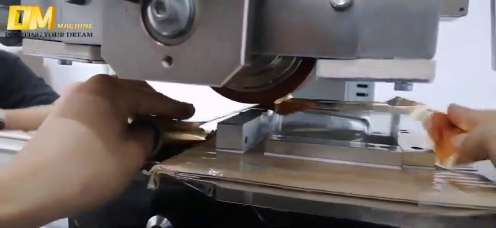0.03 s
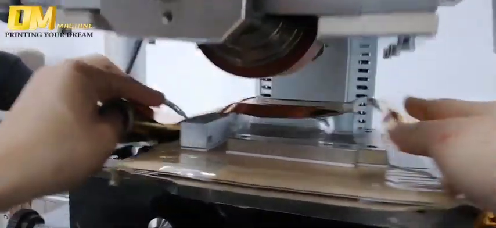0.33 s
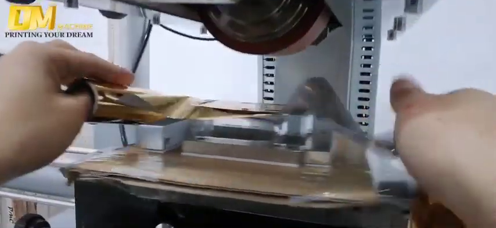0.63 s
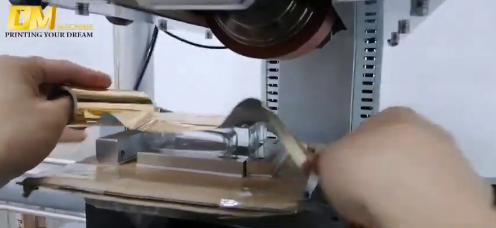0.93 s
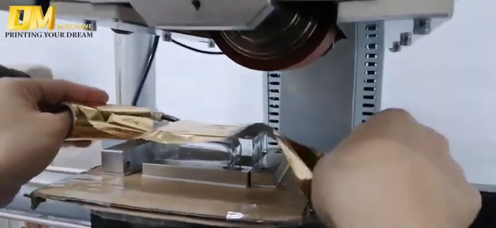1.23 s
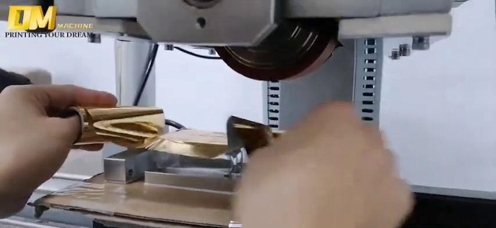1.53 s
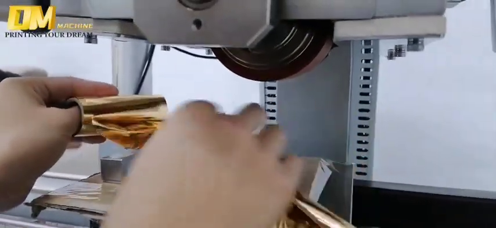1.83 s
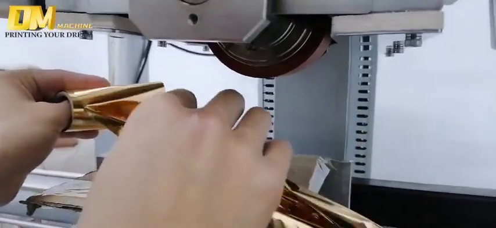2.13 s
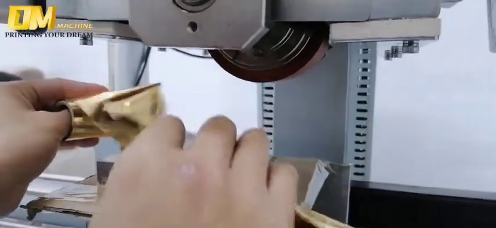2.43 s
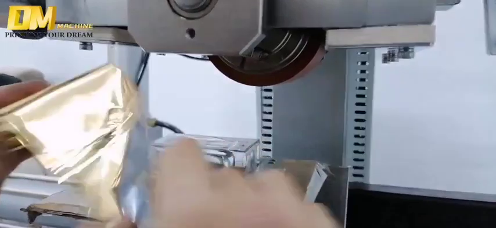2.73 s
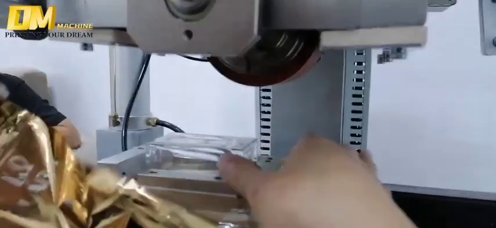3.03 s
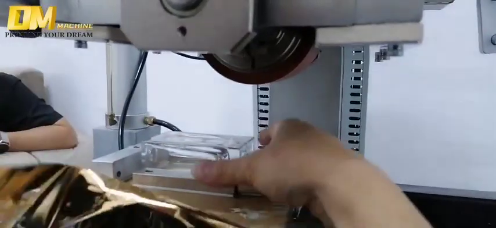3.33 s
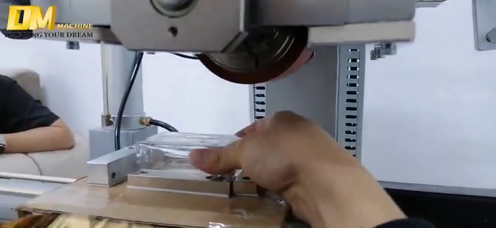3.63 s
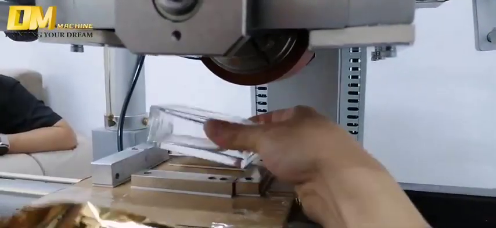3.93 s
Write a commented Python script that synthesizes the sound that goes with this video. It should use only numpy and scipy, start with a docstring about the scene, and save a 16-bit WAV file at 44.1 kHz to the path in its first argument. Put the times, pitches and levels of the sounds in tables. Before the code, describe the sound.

Thin metal foil crinkling close by is the main sound. First a press releases a hiss of air with a faint whistle, fading by about 1.5 seconds, with several dull, rattling knocks from 1 to 1.3. From 1.4 the foil is peeled away, rustling and snapping sharply, loudest between 2 and 3 seconds, thinning to a few ticks after 3.5. A low workshop rumble lies underneath.

```python
"""Peeling foil after hot stamping

A press lifts its roller: air hisses and whistles out, then the carriage knocks against its stop.
Close by, hands peel thin metal foil off a glass bottle and pull it aside. The foil hisses as it
slides, crinkles as tiny patches flip, and snaps as creases give way. The small workshop rumbles and hums."""
import sys
import numpy as np
from scipy import signal
from scipy.io import wavfile
from scipy.ndimage import uniform_filter1d

SR = 44100
rng = np.random.default_rng(int(sys.argv[2]) if len(sys.argv) > 2 else 0)


def master_out(mix):
    """Clip the mix to full scale and print it as 16-bit PCM to the path in sys.argv[1]."""
    frames = np.transpose(np.atleast_2d(mix))
    ceiling = np.clip(frames, -1, 1)
    pcm = np.round(ceiling * 32767).astype(np.int16)
    wavfile.write(sys.argv[1], SR, pcm)


N = 176400
TIME = np.arange(N) / SR

# Fading of the escaping air: time_s, treble_db, middle_db
EXHAUST_FADE = [(0, -30, -40), (.05, -34, -46), (.47, -35.5, -43.5), (.72, -37, -42.5), (.92, -41.5, -49),
                (1.1, -45, -52.5), (1.37, -49.5, -57.5), (1.8, -54, -72.5), (2.4, -57, -71.5),
                (4, -100, -100)]
# Tone of the air jet: pitch_hz, left_db, right_db
JET_TONE = [(298, -34.5, -19), (664, -12.5, -11.5), (885, -16.5, -10.5), (1610, -11, -5), (2680, -7.5, 0.5),
            (3230, -2, -5), (4300, -9.5, -9), (5200, -10, -3), (5950, -7, -4.5), (7150, -14, 6),
            (8080, -2.5, -8), (9000, -1, -2.5), (10000, -1, -6), (10830, -8.5, -11), (14300, -16, -8),
            (15400, -8, -6.5)]
# Notes that ring in the exhaust path: pitch_hz, width_hz, level_db
EXHAUST_NOTES = [(1402, 14, -2), (1473, 6.2, -4), (1950, 20, -0.5), (2133, 29, 2.5), (2860, 100, -12),
                 (3125, 35, -0.5), (3390, 77, 4)]
# Whistle at the air outlet: time_s, level_db
WHISTLE_FADE = [(0, -48), (.27, -43.5), (.38, -50.5), (.8, -53.5), (1.2, -63.5), (1.5, -86)]
# Drone of the press: time_s, level_db
DRONE_LEVEL = [(0, -45.5), (.2, -51), (.45, -60), (.9, -57.5), (1.3, -58.5), (1.8, -67), (3.4, -84.5),
               (3.85, -72), (4, -72.5)]
# Its tone: pitch_hz, level_db
DRONE_TONE = [(40, -5), (110, -10), (205, -1.5), (310, -15), (400, -5), (570, -17), (2000, -62)]
# Low rumble: time_s, level_db
RUMBLE_LEVEL = [(0, -46), (.38, -44), (.45, -56.5), (.95, -44), (1.45, -49.5), (1.8, -58), (2.25, -62),
                (2.55, -51), (3.1, -59.5), (3.5, -63.5), (3.85, -53), (4, -61.5)]
# Its tone: pitch_hz, left_db, right_db
RUMBLE_TONE = [(20.2, -14, -6), (40.1, -5, 3), (57, -19, -4.5), (104.5, -46, -30.5), (192, -24.5, -40),
               (720, -63, -54), (2000, -106, -106)]
# Tone of the room air: pitch_hz, level_db
AIR_TONE = [(200, -1.5), (1000, -10), (3000, -14.5), (9000, -18), (15000, -28)]
# Electric hum: pitch_hz, level_db
HUM_NOTES = [(49, -66), (150, -88), (200, -82)]
# Time the room's echo takes to drop 60 dB: pitch_hz, fade_s
ECHO_FADE = [(150, 0.27), (1000, 0.57), (4000, 0.19), (9000, 0.12), (15000, 0.11)]
# Carriage knocks, at relative levels: start_s, frame_db, rattle_db
KNOCKS = [(.992, -39.5, -45.5), (1.02, -35.5, -35.5), (1.154, -42, -42), (1.174, -41.5, -37.5),
          (1.264, -44.5, -45.5)]
# Notes of the press frame: pitch_hz, level_db, fade_s (to drop 60 dB)
FRAME_NOTES = [(129.6, -4, 0.88), (152.2, -1.5, 0.68), (183, 4, 0.46), (206.6, 3.5, 0.34),
               (249.8, -6, 0.53), (284, -3, 0.33), (552, -4, 0.17), (837, -7, 0.18)]
# Tone of the rattling fittings: pitch_hz, level_db
RATTLE_TONE = [(60, -8), (200, 3), (500, -2.5), (1000, -5), (2000, -10.5), (4000, -20), (9000, -42)]
# Hand strokes, at relative levels: start_s, length_s, level_db, crinkle_over_slide_db
STROKES = [(1.377, 0.037, -45.5, 5), (1.427, 0.258, -46.5, 0), (1.468, 0.046, -41.5, -6),
           (1.724, 0.087, -45, -7), (1.83, 0.27, -42.5, -3), (1.901, 0.16, -41, 1.5), (2.1, 0.218, -52, 16),
           (2.388, .086, -48, 9), (2.48, 0.062, -41, -3), (2.549, .058, -36, 1), (2.608, 0.16, -42, 3),
           (2.654, 0.045, -37, 1), (2.772, 0.28, -46, -26), (2.857, 0.14, -43.5, -2),
           (2.971, 0.051, -40, -4), (3.05, 0.038, -39.5, -8), (3.072, 0.44, -53.5, -1),
           (3.241, 0.043, -43, 2), (3.314, 0.12, -50.5, -5), (3.5, .45, -66, 6), (3.603, 0.041, -47, -5),
           (3.742, 0.027, -61.5, -6), (3.806, 0.023, -55.5, 0)]
# Where the foil is pulled: time_s, left_over_right_db
FOIL_PLACE = [(1.4, -3.5), (2, -8), (2.2, 1), (2.57, -3.5), (3, -1)]
# Snapping creases, at relative levels and places: start_s, level_db, leftward_db, length_s
SNAPS = [(1.402, -39, -1, 0.013), (1.483, -36, 1, 0.006), (1.514, -32, -3, .006), (1.555, -33.5, -5, .005),
         (1.594, -37.5, -5, 0.0035), (1.67, -33, -6, .008), (1.757, -32.5, -4, 0.0042),
         (1.7635, -27, -17, .001), (1.771, -32, -5, .003), (1.798, -36, -8, .009), (1.861, -33, -6, 0.0096),
         (1.928, -36, -6, .006), (2.003, -29, -12, 0.0075), (2.048, -36, -14, 0.0094),
         (2.0635, -30, -5, 0.0022), (2.0904, -26.5, -5, 0.0041), (2.142, -35, -5, .002),
         (2.174, -36.5, -6, .01), (2.199, -35, -8, 0.0099), (2.25, -47, 9, .002),
         (2.2567, -29.5, -9.5, 0.0051), (2.364, -36, -3, 0.0033), (2.387, -38, -7, 0.0027),
         (2.395, -35, -7.5, 0.0086), (2.463, -35, 0, 0.0043), (2.559, -33, 8, 0.0033),
         (2.565, -27.5, -16, 0.011), (2.618, -32, -5, 0.011), (2.643, -31, 3, .003),
         (2.665, -28.5, -1, .004), (2.678, -30, 2, 0.0075), (2.704, -27.5, -0.5, .008),
         (2.742, -37, -5, 0.014), (2.906, -29.5, -5.5, 0.0074), (2.942, -35, -5, 0.0056),
         (3.228, -39.5, -5, 0.0068), (3.271, -40, 12, 0.008), (3.298, -37, -3, 0.0037),
         (3.332, -33.5, 10, 0.0042), (3.366, -39.5, -1, 0.012), (3.456, -31.5, 1, 0.0033),
         (3.482, -41, -4, .009), (3.59, -36.5, -2, 0.0026), (3.9017, -42, 2, 0.0019),
         (3.9668, -41, 0, .0016)]
# Extra brightness of a snap: pitch_hz, level_db
SNAP_TONE = [(3000, -2.5), (7000, 2), (12000, 1.5)]
# Folds of the whole sheet: start_s, level_db
FOLDS = [(1.861, -55), (2.02, -52), (2.179, -53), (2.575, -51), (2.619, -48.5), (2.671, -49),
         (2.735, -57.5), (2.88, -51), (2.905, -50), (3.257, -59)]
# Tone of their crunch: pitch_hz, level_db
FOLD_TONE = [(100, -28), (900, 1.5), (1700, -3.5), (2800, 4), (4300, -5.5), (9000, -37)]
# Tone of the foil: pitch_hz, left_db, right_db
FOIL_TONE = [(60, -34, -39), (510, -19.5, -24), (1010, -14.5, -16.5), (1550, -22, -19), (2520, -9, -13),
             (3990, -15, -19), (5050, -8, -7), (7200, -12, -3), (9200, 1, -10.5), (10160, 1, -5.5),
             (10230, -8, -7), (13200, -9, -12.5), (14500, -12.5, -7)]
# Top treble of the foil, tight and then slack: time_s, boost_db
TIGHTNESS = [(2.2, 3.5), (2.6, -3.5)]
# Low swell as the hand takes the glass: time_s, level_db
SWELL_LEVEL = [(3.3, -88.5), (3.82, -67.5), (4, -70)]


def amp(db):
    """Turns decibels into a gain."""
    return 10 ** (np.asarray(db) / 20)


def unit(x):
    """Scales to an average power of 1."""
    return x / np.sqrt(np.mean(x ** 2) + 1e-20)


def read(table, hz, column=1):
    """Looks up a table by pitch, on a log scale."""
    table = np.array(table)
    return np.interp(np.log(hz + 1), np.log(table[:, 0] + 1), table[:, column])


def level(table, column=1):
    """Gain over time from a decibel curve."""
    table = np.array(table)
    return amp(np.interp(TIME, table[:, 0], table[:, column]))


def pan(db):
    """Left and right gains; positive leans left."""
    return unit(amp([[db / 2], [-db / 2]]))


def add(mix, start_s, sound):
    """Mixes a stereo sound in."""
    part = mix[:, max(round(start_s * SR), 0):][:, :sound.shape[1]]
    part += sound[:, :part.shape[1]]


def colour(x, table, size=8192):
    """Gives a sound the tone in a table; white noise keeps its power."""
    hz = abs(np.fft.fftfreq(size, 1 / SR))
    log_gain = np.log(amp([read(table, hz, k) for k in range(1, len(table[0]))]))
    taps = np.fft.ifft(np.exp(np.conj(signal.hilbert(log_gain)))).real[:, :size // 2]
    return signal.fftconvolve(x, unit(taps) / np.sqrt(size // 2), axes=1)[:, :N]


def noise(shared):
    """White noise, partly shared by left and right."""
    both, left, right = rng.standard_normal((3, N))
    return np.sqrt(shared) * both + np.sqrt(1 - shared) * np.array([left, right])


def ragged(size, db, samples):
    """Random gain that wanders over about this many samples."""
    return amp(db * unit(uniform_filter1d(rng.standard_normal(size), samples)))


def ring(x, hz, width_hz, passes=1):
    """Makes a sound ring around one pitch; more passes narrow it."""
    for _ in range(passes):
        x = signal.lfilter(*signal.iirpeak(hz, hz / width_hz, SR), x)
    return x


def room(x):
    """The workshop's echo: each pitch dies at its own speed."""
    hz, t, bands = signal.stft(rng.standard_normal((2, SR // 2)), SR, nperseg=256)
    fade = amp(-60 * t / read(ECHO_FADE, hz)[:, None]) * (t > .004)
    tail = signal.istft(bands * fade, SR, nperseg=256)[1]
    return signal.fftconvolve(x, unit(tail) / np.sqrt(tail.shape[1]), axes=1)[:, :N]


def exhaust(split_hz=3930):
    """An air jet rings the exhaust path and whistles, fading as the pressure drops."""
    jet = colour(noise(0.15) + amp(1) * room(noise(1)), JET_TONE)
    body = signal.sosfiltfilt(signal.butter(4, split_hz, fs=SR, output="sos"), jet)
    flow = noise(0.25) * pan(-12.5)
    path = unit(sum(amp(db) * unit(ring(flow, hz, width)) for hz, width, db in EXHAUST_NOTES))
    treble = unit(jet - body) * level(EXHAUST_FADE)
    middle = (unit(body) + amp(-3) * path) * level(EXHAUST_FADE, column=2)
    whistle = unit(ring(flow, hz=2446, width_hz=60, passes=2)) * level(WHISTLE_FADE)
    return treble + middle + whistle


def drone():
    """The press drones low, loudest at the start."""
    return level(DRONE_LEVEL) * colour(noise(0.97), DRONE_TONE)


def workshop():
    """Low rumble, room air and electric hum."""
    rumble = level(RUMBLE_LEVEL) * unit(colour(noise(0.91), RUMBLE_TONE))
    air = amp(-68.5) * colour(noise(0.36), AIR_TONE)
    hum = sum(amp(db) * np.sin(2 * np.pi * (hz * TIME + rng.random())) for hz, db in HUM_NOTES)
    return rumble + air + np.sqrt(2) * hum * pan(1)


def carriage(rise_s=0.0066, rattle_fade_s=0.11):
    """Each knock rings the press frame and shakes its fittings."""
    frame, rattle = np.zeros((2, 2, N))
    t = np.arange(SR // 2) / SR
    rise = np.minimum(t / rise_s, 1)
    notes = sum(amp(db - 60 * t / fade_s) * np.sin(2 * np.pi * hz * t) for hz, db, fade_s in FRAME_NOTES)
    for start_s, frame_db, rattle_db in KNOCKS:
        add(frame, start_s, amp(frame_db) * rise * notes * pan(-6))
        shake = rise * amp(rattle_db - 60 * t / rattle_fade_s)
        add(rattle, start_s, shake * noise(0.84)[:, :len(t)])
    rattle = colour(rattle, RATTLE_TONE) * pan(-5)
    return amp(-4.5) * frame + rattle + amp(-5) * room(rattle)


def patch_ring(x, hz):
    """A small patch of foil rings briefly."""
    return amp(-0.5) * ring(x, hz, width_hz=2600)


def crinkles(patches=24, flips_per_s=800, spread_db=4.3, tick_s=0.0013):
    """Tiny patches of foil flip in random clumps, each with its own pitch and place."""
    t, out = np.arange(256) / SR, np.zeros((2, N))
    for hz in np.geomspace(5000, 14500, patches):
        sizes = amp(spread_db * np.minimum(rng.exponential(1, N), 3))
        flips = sizes * (rng.random(N) < flips_per_s / patches / SR)
        tick = rng.standard_normal((2, len(t))) * np.exp(-t / tick_s)
        tick = unit(tick + patch_ring(tick, hz)) * pan(7 * rng.standard_normal())
        out += signal.oaconvolve(flips[None], tick, axes=1)[:, :N]
    return unit(out * ragged(N, db=2, samples=500))


def rustle(rise_s=0.003, fall_s=0.0055):
    """Each hand stroke sets off crinkles over the hiss of sliding foil."""
    crinkle_power, slide_power = np.zeros((2, N))
    for start_s, length_s, db, crinkle_db in STROKES:
        rise = np.clip((TIME - start_s) / rise_s, 0, 1)
        fall = np.exp(-np.maximum(TIME - start_s - length_s, 0) / fall_s)
        power = (amp(db) * rise * fall) ** 2
        slide_share = 1 / (1 + amp(crinkle_db) ** 2)
        crinkle_power += power * (1 - slide_share)
        slide_power += power * slide_share
    sound = np.sqrt(crinkle_power) * crinkles() + np.sqrt(slide_power) * noise(0.22)
    lean = np.sqrt(level(FOIL_PLACE))
    return amp(-0.5) * np.array([lean, 1 / lean]) * sound


def snaps(rise_s=0.00014, scatter_s=0.005):
    """A crease gives way in a ragged burst that rings one patch and scatters off the press."""
    t, out = np.arange(SR // 25) / SR, np.zeros((2, N))
    for start_s, db, leftward_db, length_s in SNAPS:
        scatter = amp(-9) * np.exp(-t / scatter_s)
        shape = np.minimum(t / rise_s, 1) * np.hypot(np.exp(-(t / length_s) ** 2), scatter)
        burst = rng.standard_normal((2, len(t))) + 0.33 * rng.standard_normal(len(t))
        burst *= ragged(len(t), db=1.5, samples=20) * shape
        burst += patch_ring(burst, hz=rng.uniform(5500, 15000))
        gain = amp(db - 1.5) * np.sqrt(np.mean(shape ** 2))
        add(out, start_s, gain * unit(burst) * pan(leftward_db + 2))
    return colour(out, SNAP_TONE)


def folds(length_s=0.019):
    """A wide part of the sheet folds over with a lower crunch."""
    push = sum(amp(db) * (TIME > s) * np.exp(-((TIME - s) / length_s) ** 2) for s, db in FOLDS)
    crunch = noise(0.61) * unit(ragged(N, db=1.5, samples=100))
    return push * colour(crunch, FOLD_TONE)


def foil(top_hz=10500):
    """All the foil's sounds, brighter while the sheet is tight."""
    sheet = colour(rustle() + snaps(), FOIL_TONE)
    top = signal.sosfiltfilt(signal.butter(4, top_hz, "high", fs=SR, output="sos"), sheet)
    left, right = sheet + (level(TIGHTNESS) - 1) * top + folds()
    direct = np.array([left, np.pad(right, (7, 0))[:N]])  # reaches the left side 7 samples sooner
    return direct + amp(-13) * room(direct)


def glass_swell():
    """A low swell as the hand takes the glass."""
    return level(SWELL_LEVEL) * unit(ring(noise(1), hz=130, width_hz=123, passes=2)) * pan(1)


def scene():
    """Press, workshop and foil together."""
    return exhaust() + drone() + workshop() + carriage() + foil() + glass_swell()


def record(dry):
    """Cuts the treble above 15500 Hz."""
    taps = signal.firwin(255, 15500, window=("kaiser", 8), fs=SR)
    return signal.oaconvolve(dry, taps[None], "same")


dry = scene()
out = record(dry)
master_out(out)
```